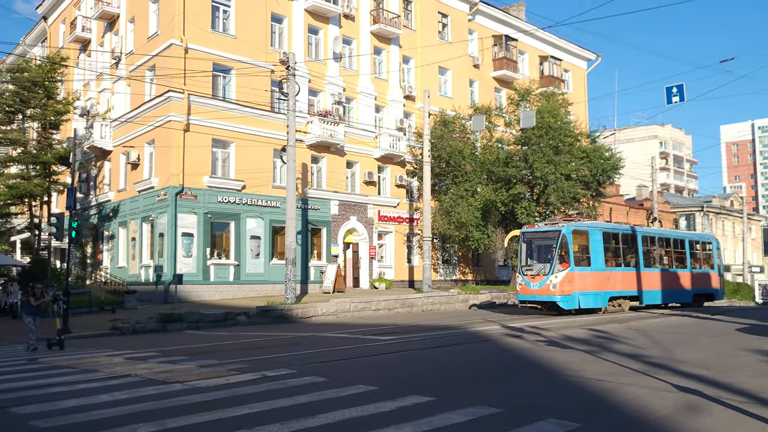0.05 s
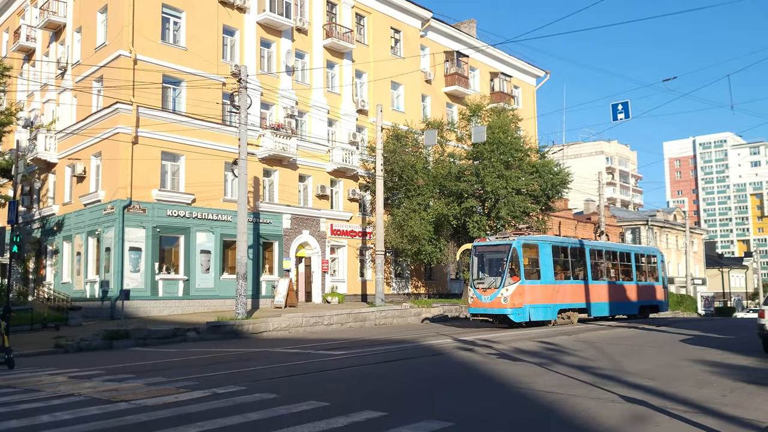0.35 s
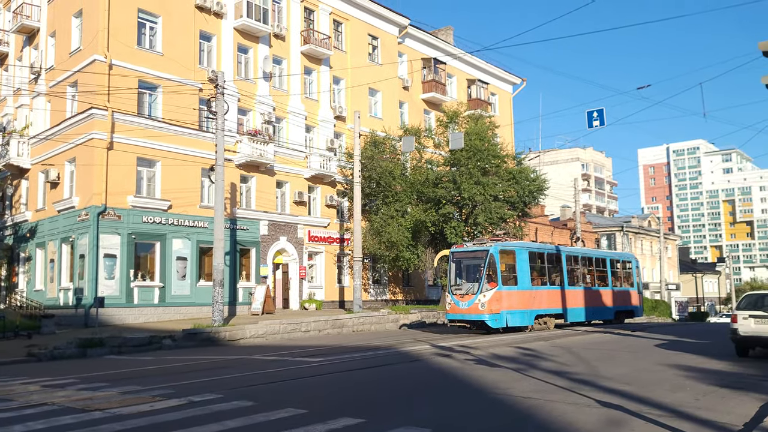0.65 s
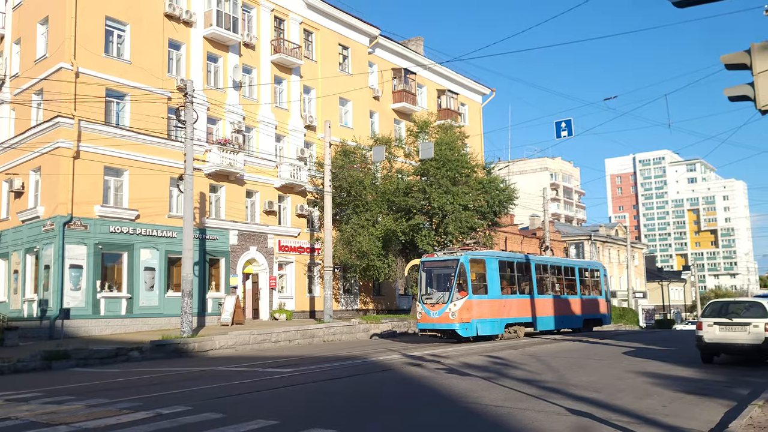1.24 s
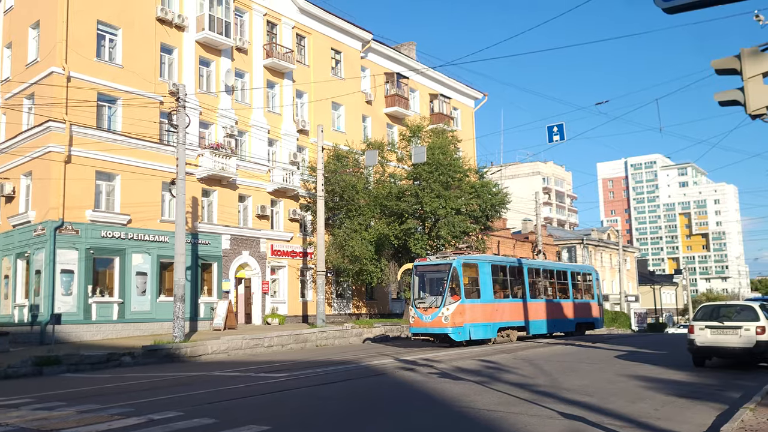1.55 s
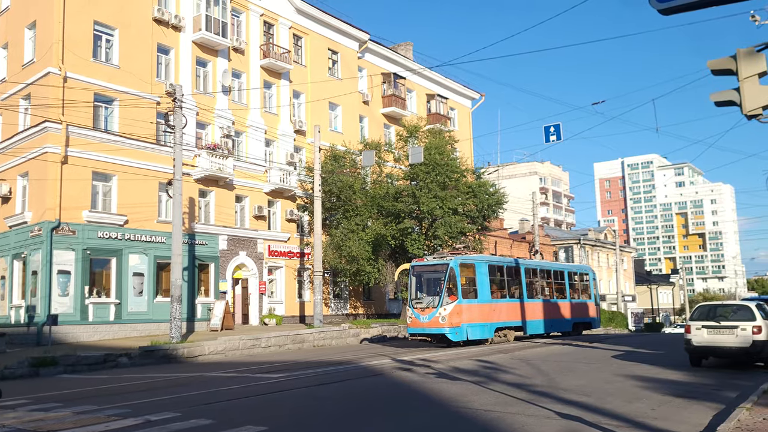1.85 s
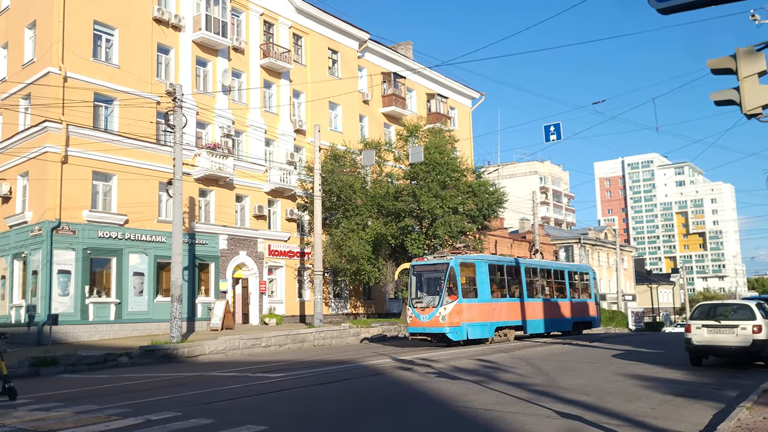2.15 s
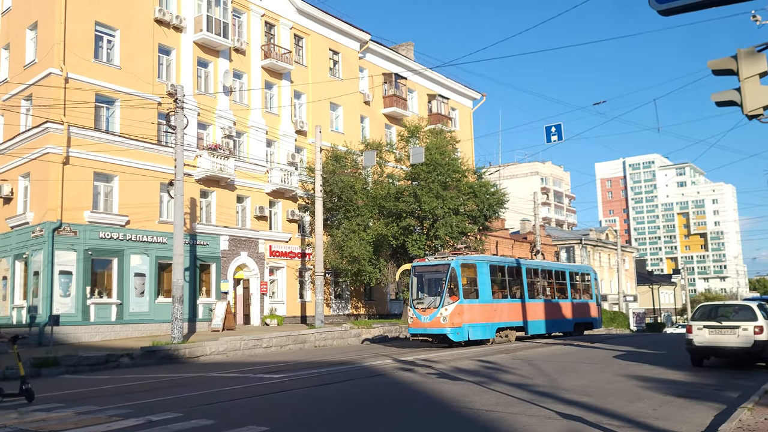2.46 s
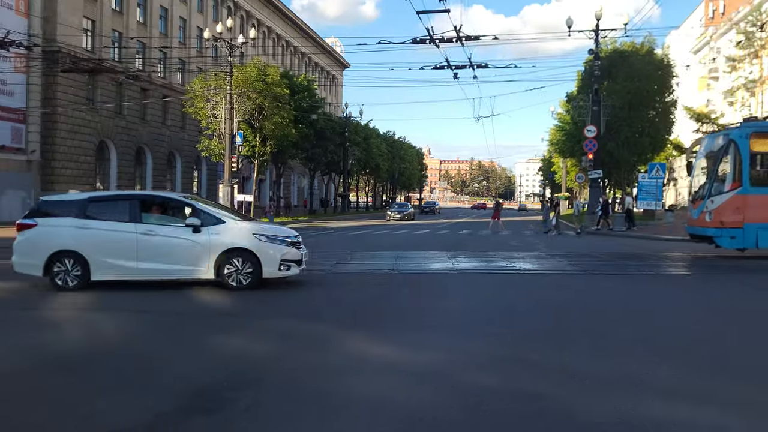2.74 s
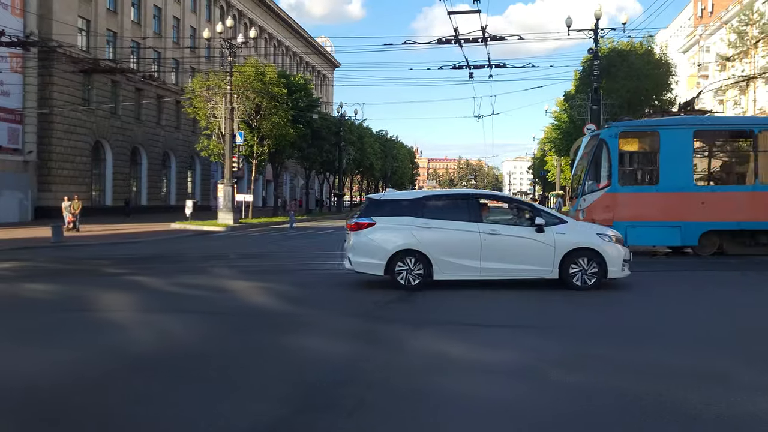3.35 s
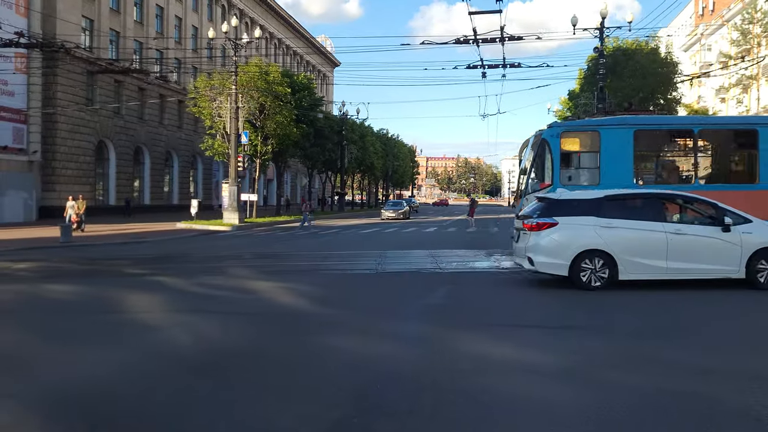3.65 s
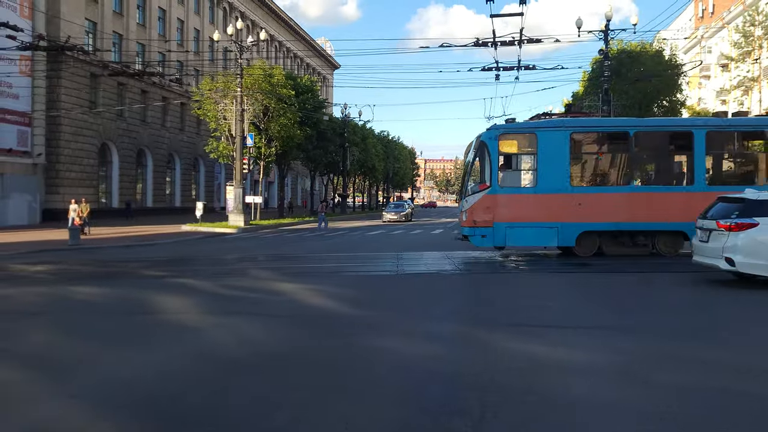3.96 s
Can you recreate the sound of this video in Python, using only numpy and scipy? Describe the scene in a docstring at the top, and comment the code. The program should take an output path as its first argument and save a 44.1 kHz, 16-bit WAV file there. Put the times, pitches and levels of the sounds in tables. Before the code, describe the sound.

A tram passes at a street crossing. Traffic rumble, tyre noise and an accelerating engine are heard from across the junction, then suddenly from the trackside come clacking wheels, ringing steel and a passing car's hum.

```python
"""City crossing with a tram, far and near.

From across the junction, an engine pulls away over traffic rumble and tyre noise, with faint ticks
and a thin brake squeal. After an abrupt cut the microphone is close to the track as a tram rolls by:
its wheels clack over rail joints, the steel running gear rattles and rings, a flange starts to scrape."""
import sys
import numpy as np
from scipy import signal
from scipy.fft import rfft, irfft
from scipy.io import wavfile

SR = 44100
rng = np.random.default_rng(int(sys.argv[2]) if len(sys.argv) > 2 else 0)


def to_wav(sig):
    """Store sig (one row per channel, or 1-D mono) as 16-bit WAV at the path in sys.argv[1].

    Samples outside -1..1 are clipped; the rate is SR.
    """
    pcm = np.clip(np.atleast_2d(sig), -1, 1) * 32767
    pcm = np.round(pcm).astype(np.int16)
    wavfile.write(sys.argv[1], SR, pcm.T)  # frames by channels


N = 176400
T = np.arange(N) / SR
F = np.fft.rfftfreq(N, 1 / SR) + 1e-3
CUT_S, RESUME_S = 2.708, 2.725  # the far position ends, the near one begins
STEEL_ATTACK_S = .006

# wheels striking rail joints: t/s, thud level/dB, clank level/dB, steel level/dB
WHEEL_BLOWS = [(2.818, -40, -28, -52), (2.864, -24, -42, -41), (2.908, -38, -28, -52),
               (2.942, -22, -40, -60), (2.993, -21, -12.5, -44), (3.026, -24, -22, -41),
               (3.049, -21, -19, -29), (3.072, -26, -20, -42), (3.355, -14, -23, -54),
               (3.384, -19, -23, -44), (3.398, -24, -22, -48), (3.410, -18, -21, -25.5),
               (3.461, -28, -27, -46), (3.499, -29, -26, -35)]
# rolling noise at the trackside: t/s, level/dB
ROLLING_LEVEL = [(2.72, -32), (2.92, -30), (3.25, -31), (3.55, -30.5), (3.75, -34), (4, -30)]
# stereo image at the far and the near position: f/Hz, left minus right/dB
IMAGE_FAR = [(500, -.7), (1300, -3.5), (2400, -6), (4400, 0.14), (8100, 9), (15000, 4.87)]
IMAGE_NEAR = [(300, -1), (1300, -3.5), (2400, -.5), (4400, 3.5), (8100, 20.5), (15000, 10)]


def rail_joints():
    """Close by, each wheel blow thuds, clanks and clashes; the street adds a short tail."""
    # spectra of the three parts of a blow: f/Hz, relative level/dB
    thud = [(50, -9), (150, -10), (240, 0), (340, 0), (500, -6.5), (900, -18), (2000, -50)]
    clank = [(200, 4), (450, -1), (900, 1.5), (1500, -3.5), (2200, -1), (2900, -12.5), (5000, -27),
             (12000, -47)]
    steel = [(1200, -33), (2600, -2), (4700, -0.5), (7500, -3.5), (8600, -11), (10200, -4), (14500, -16),
             (16000, -2)]
    parts = [(thud, .002, .022), (clank, .002, .008), (steel, STEEL_ATTACK_S, .027)]
    out = 0
    for part, (colour, attack_s, decay_s) in enumerate(parts):
        power = 0
        for start, *levels in WHEEL_BLOWS:
            direct = strike(start, decay_s, attack_s)
            tail = undb(-11.5) * strike(start, decay_s=.089, attack_s=.016)
            power += undb(levels[part]) ** 2 * (direct ** 2 + tail ** 2)
        out += wash(colour, IMAGE_NEAR) * np.sqrt(power) * undb(2 + .55 * wander(130))
    return out


def running_gear():
    """Steel parts ring on after each blow, every mode stirred differently; one wheel rim keeps singing."""
    modes = [(2256, 3), (2702, 0), (3494, 0), (3682, 1), (3860, 2), (4716, 0), (5464, 0), (5846, -4),
             (6142, -2), (7386, -7), (7625, -6), (8963, -11), (10200, -9), (12145, -7), (13065, -5)]  # steel resonances: f/Hz, relative level/dB
    rim_level = [(3.0, -68), (3.34, -64), (3.385, -47), (3.42, -56), (3.9, -73)]  # singing rim: t/s, level/dB
    blow_power = np.array([(undb(steel_db) * strike(start, decay_s=.105, attack_s=STEEL_ATTACK_S)) ** 2
                           for start, _, _, steel_db in WHEEL_BLOWS])
    ring = 0
    for hz, db in modes:
        stir = undb(3 * rng.standard_normal(len(WHEEL_BLOWS))) ** 2
        ring += noise(resonance(hz, width_hz=44), IMAGE_NEAR) * undb(db) * np.sqrt(stir @ blow_power)
    ring /= np.sqrt(sum(undb(db) ** 2 for _, db in modes))
    rim = noise(resonance(11050, width_hz=130), IMAGE_NEAR) * undb(curve(rim_level))
    return ring * undb(-7.5) + rim


def rattles():
    """The tram's loose fittings chatter at random, as strongly as it rolls."""
    colour = [(1800, -22), (2600, 0), (3900, -9), (6000, -28)]  # small fittings: f/Hz, relative level/dB
    knocks_per_s, decay_s = 70, .012
    knocks = (rng.random(N) < knocks_per_s / SR) * rng.random(N)
    chatter = unit(die_away(knocks, decay_s))
    return wash(colour, IMAGE_NEAR) * chatter * undb(curve(ROLLING_LEVEL) - 19)


def flange():
    """A wheel flange sticks and slips on the rail close by: a stack of unsteady partials."""
    partials = [(2, 0), (3, -12.5), (4, -14), (5.2, -12), (6, -18), (8.8, -27)]  # scraping steel: multiple of the pitch, relative level/dB
    start_s, pitch_hz = 3.93, 1304
    phase = unsteady_phase(pitch_hz, jitter=.016, rate_hz=200)
    scrape = 0
    for multiple, db in partials:
        grind = 1 + .75 * np.array([wander(200), wander(200)])
        side_db = np.interp(multiple * pitch_hz, F, over_hz(IMAGE_NEAR))
        scrape += undb(db) * grind * np.sin(multiple * phase) * pan(side_db)
    return unit(scrape) * undb(-33.5) * np.clip((T - start_s) / STEEL_ATTACK_S, 0, 1)


def engines():
    """Across the junction an engine climbs and eases off, ever smoother and duller; a second drones."""
    firing = [(0, 98.95), (.15, 102.7), (.35, 102.9), (1.0, 110.7), (1.4, 114), (1.88, 116.6),
              (2.15, 116.4), (2.6, 113.4)]  # firing rate: t/s, f/Hz
    effort = [(0, -24.5), (.18, -28), (.28, -26), (.42, -30), (.5, -24), (.8, -26.5), (1.05, -23),
              (1.22, -29), (1.35, -30.5), (1.47, -28), (1.68, -23), (1.9, -18.5), (1.98, -36.5),
              (2.08, -26.5), (2.18, -32), (2.28, -27.5), (2.5, -24.5), (2.62, -37)]  # engine load: t/s, level/dB
    brightness = [(.3, 0.5), (1.15, -1), (1.45, -8), (1.8, -11), (2.2, -6.5), (2.6, -22.5)]  # lift of the upper harmonics: t/s, relative level/dB
    harmonics = [(1, -16.5, 0.11), (2, 1.5, 0.12), (3, -1.5, 0.88), (4, -6, 1.83), (5, -19.5, 0.37),
                 (6, -18.5, 1.1)]  # engine tone: multiple, relative level/dB, share of the lift
    roughness = [(.3, .42), (1.0, .19)]  # flutter, settling with speed: t/s, depth/0-1
    drone = [(0, 145.6, -24.5), (.3, 145.3, -25.5), (.55, 150, -27), (1.15, 154.6, -29.5), (1.5, 157, -48)]  # second engine: t/s, f/Hz, level/dB
    drone_partials = [(.5, -2.5), (1, 0), (2, -9), (3, -12), (3.5, -18)]  # its tone: multiple, relative level/dB
    effort_db, lift_db, rough = curve(effort), curve(brightness), curve(roughness)
    phase = unsteady_phase(curve(firing), jitter=.025 * rough, rate_hz=14.4)
    first = sum(undb(effort_db + db + share * lift_db) * (1 + rough * wander(19)) * np.sin(k * phase)
                for k, db, share in harmonics)
    phase = unsteady_phase(curve(drone), jitter=.002, rate_hz=20)
    second = sum(undb(db) * (1 + rough / 2 * wander(7.5)) * np.sin(k * phase) for k, db in drone_partials)
    return np.sqrt(2) * (first + second * undb(curve(drone, column=2))) * pan(-.6)


def brake_and_wheel_rings():
    """A thin brake squeal far off, then two brief metallic rings as the wheels strike close by."""
    # narrow resonances: start t/s, end t/s, rise/s, f/Hz, width/Hz, level/dB, left minus right/dB
    tones = [(2.474, 2.704, 0.077, 13160, 169.4, -37, 7), (2.896, 2.91, .008, 2580, 200, -36, 0),
             (3.044, 3.076, .014, 2590, 150, -27.5, 0)]
    release_s = .03
    out = 0
    for start, end, rise, hz, width_hz, db, side_db in tones:
        envelope = np.clip((T - start) / rise, 0, 1) ** 2 * np.exp(-np.maximum(T - end, 0) / release_s)
        envelope *= (T < CUT_S) == (start < CUT_S)  # no ring carries across the cut
        out += undb(db) * envelope * noise(resonance(hz, width_hz), [(hz, side_db)])
    return out


def near_traffic():
    """At the trackside: the tram's rumble, rolling noise and rail hiss, and a passing car's rough hum."""
    # spectra: f/Hz, relative level/dB
    rumble_colour = [(35, -29), (54, 9.5), (85, 2.5), (120, 8), (175, -0.5), (280, 8), (400, -4),
                     (650, -46)]
    rolling_colour = [(150, -15), (450, 1), (900, -3.5), (1500, -6.5), (2700, -14), (4000, -19),
                      (7500, -33.5), (9000, -40), (15000, -50)]
    hiss_colour = [(2500, -18), (4300, 1), (7500, -3), (8600, -11), (15000, -14)]
    # swells: t/s, level/dB
    rumble_level = [(2.72, -27), (2.95, -24.5), (3.25, -28.5), (3.75, -27.5), (4, -25)]
    hiss_level = [(3.3, -57), (3.55, -41), (3.68, -63), (4, -52)]
    car_engine = [(2.72, 117.9, -34), (3.55, 112.4, -38.5), (3.75, 105.5, -30), (3.87, 105, -25.5),
                  (4, 105, -36)]  # passing car: t/s, f/Hz, level/dB
    rumble = wash(rumble_colour, IMAGE_NEAR) * undb(curve(rumble_level))
    rolling = wash(rolling_colour, IMAGE_NEAR) * undb(curve(ROLLING_LEVEL) + .34 * wander(30))
    hiss = wash(hiss_colour, IMAGE_NEAR) * undb(curve(hiss_level) + 2 * wander(63))
    phase = unsteady_phase(curve(car_engine), jitter=.053, rate_hz=30)
    hum = np.sqrt(2) * np.sin(phase) * undb(curve(car_engine, column=2) + 2 * wander(30))
    return rumble + rolling + hiss + hum


def far_traffic():
    """Rumble and tyres across the junction, with one car drawing nearer to the microphone."""
    # spectra: f/Hz, relative level/dB
    rumble_colour = [(33, -29), (50, 17.5), (72, 11), (88, 11.5), (112, 14.5), (175, 1), (270, 8.5),
                     (400, -5.5), (650, -48)]
    tyre_colour = [(150, 4), (400, 3), (700, -2), (1200, -6.5), (2300, -10), (3300, -16), (5000, -28.5),
                   (8500, -40), (12000, -40.5), (15000, -49)]
    car_colour = [(300, -18), (850, 4.5), (1350, 1), (1950, 1), (2700, -9.5), (4000, -30), (9000, -53)]
    # swells: t/s, level/dB
    rumble_level = [(0, -22.5), (.2, -22.5), (.55, -26), (1.0, -27), (1.55, -26.5), (1.87, -25), (2.1, -26),
                    (2.6, -28)]
    tyre_level = [(0, -30), (.6, -29), (1.2, -31.5), (1.9, -34), (2.7, -31.5)]
    car_level = [(0, -68), (1.2, -40), (2.0, -38), (2.4, -34), (2.7, -33)]
    rumble = wash(rumble_colour, IMAGE_FAR) * undb(curve(rumble_level))
    tyres = wash(tyre_colour, IMAGE_FAR, lead_s=.000422) * undb(curve(tyre_level) + .58 * wander(48))
    car = wash(car_colour, IMAGE_FAR, lead_s=.00007) * undb(curve(car_level) + .97 * wander(25))
    return rumble + tyres + car


def boom():
    """The narrow low boom of heavy vehicles, under both positions."""
    colour = [(25, -48), (38, -8), (47, -10), (55, 8), (70, -9.5), (95, -8), (200, -85.5)]  # boom spectrum: f/Hz, relative level/dB
    level = [(0, -32), (.9, -47), (1.3, -24), (1.65, -36), (1.87, -24), (2.1, -35), (2.33, -38),
             (2.46, -20), (2.62, -39), (3.3, -29.5), (4, -26)]  # its swells: t/s, level/dB
    return wash(colour, IMAGE_FAR) * undb(curve(level))


def ticks():
    """Faint dry ticks left of the microphone, over a fine crackle that thickens around each of them."""
    events = [(0.063, -41), (0.367, -37.5), (.614, -42), (.86, -45), (1.125, -48), (1.343, -47),
              (1.639, -49), (1.871, -56)]  # single ticks: t/s, level/dB
    colour = [(3000, -15), (6500, -8), (8500, -12), (10800, 1), (13000, -4.5), (16000, -1.5)]  # tick spectrum: f/Hz, relative level/dB
    decay_s, patch_s, grains_per_s = .00076, .024, 150
    clicks = sum(undb(db) * strike(at, decay_s, attack_s=.0002) for at, db in events)
    patches = sum(undb(db - 11.5) * np.exp(-abs(T - at) / patch_s) for at, db in events)
    grains = (rng.random(N) < grains_per_s / SR) * rng.exponential(size=N)
    crackle = (patches + undb(-67)) * unit(die_away(grains, decay_s))
    bursts = (clicks + crackle) * rng.standard_normal(N)
    return irfft(rfft(bursts) * unit(undb(over_hz(colour))), N) * pan(12)


def noise(gain, image, lead_s=0):
    """Stereo noise of rms 1: a diffuse part, and a common part whose treble is lead_s early on the left."""
    likeness = [(200, 0.91), (500, 0.66), (1000, 0.46), (3000, 0.28)]  # the microphone's two sides: f/Hz, coherence/0-1
    coherence = over_hz(likeness)
    white = rfft(rng.standard_normal((3, N)))
    delay_s = lead_s * np.clip(F / 1000 - .5, 0, 1) * np.array([[0], [1]])
    common = np.sqrt(coherence) * white[0] * np.exp(-2j * np.pi * F * delay_s)
    diffuse = np.sqrt(1 - coherence) * white[1:]
    return unit(irfft((common + diffuse) * gain * pan(over_hz(image)), N))


def wash(colour, image, lead_s=0):
    """Stereo noise with a tabled spectrum."""
    return noise(undb(over_hz(colour)), image, lead_s)


def resonance(hz, width_hz):
    """Gain of one narrow peak."""
    return 1 / (1 + ((F - hz) / (width_hz / 2)) ** 2)


def strike(start, decay_s, attack_s):
    """Quick rise and exponential fall."""
    age = np.maximum(T - start, 0)
    return np.minimum(age / attack_s, 1) * np.exp(-age / decay_s)


def die_away(impulses, decay_s):
    """Give each impulse an exponential tail."""
    return signal.lfilter([1], [1, -np.exp(-1 / (decay_s * SR))], impulses)


def wander(rate_hz):
    """Smooth random drift of spread 1."""
    return unit(irfft(rfft(rng.standard_normal(N)) * np.exp(-(F / rate_hz) ** 2) * (F > 1), N))


def unsteady_phase(hz, jitter, rate_hz):
    """Phase of a tone whose pitch wanders by the fraction jitter."""
    return 2 * np.pi * np.cumsum(hz * (1 + jitter * wander(rate_hz))) / SR


def curve(rows, column=1):
    """A table column joined by straight lines in time."""
    rows = np.array(rows)
    return np.interp(T, rows[:, 0], rows[:, column])


def over_hz(rows):
    """A table joined by straight lines in log frequency."""
    rows = np.array(rows)
    return np.interp(np.log(F), np.log(rows[:, 0]), rows[:, 1])


def pan(db):
    """Constant-power gains, the left db louder than the right."""
    gains = undb(np.array([db, -db]) / 2).reshape(2, -1)
    return gains / np.sqrt(np.mean(gains ** 2, axis=0))


def undb(db):
    """Decibels to gain."""
    return 10 ** (np.asarray(db) / 20)


def unit(x):
    """Scale to rms 1."""
    return x / np.sqrt(np.mean(x ** 2))


def scene():
    """The far position, a blink of silence, then the trackside."""
    fade_s = .0023
    far_gate = np.clip(np.minimum(T, CUT_S - T) / fade_s, 0, 1)
    near_gate = np.clip((T - RESUME_S) / fade_s + .5, 0, 1)
    far = engines() + far_traffic() + ticks()
    near = near_traffic() + rail_joints() + running_gear() + rattles() + flange()
    both = brake_and_wheel_rings() + boom()
    return far_gate * far + near_gate * near + (far_gate + near_gate) * both


def record(dry):
    """The recorder drops the deepest bass and cuts the top."""
    low_cut = signal.butter(4, 32, "high", fs=SR, output="sos")
    top_cut = signal.ellip(10, .2, 80, 15550, fs=SR, output="sos")
    return signal.sosfilt(top_cut, signal.sosfilt(low_cut, dry))


dry = scene()
out = record(dry)
to_wav(out)
```